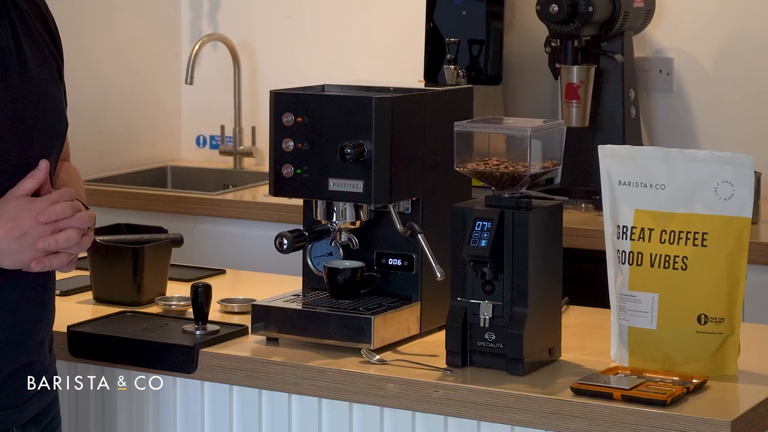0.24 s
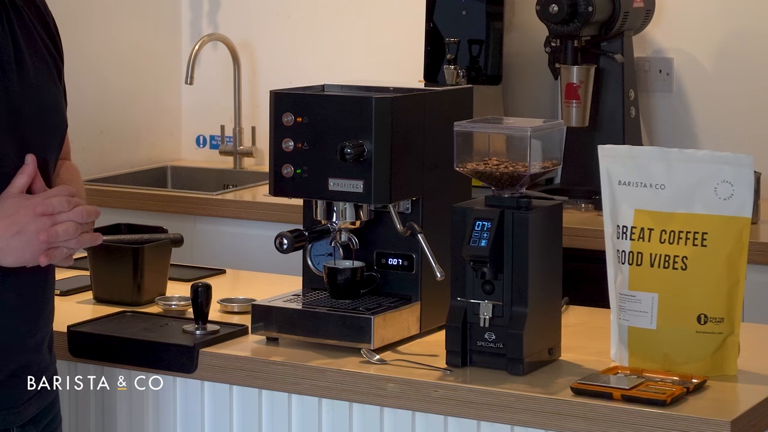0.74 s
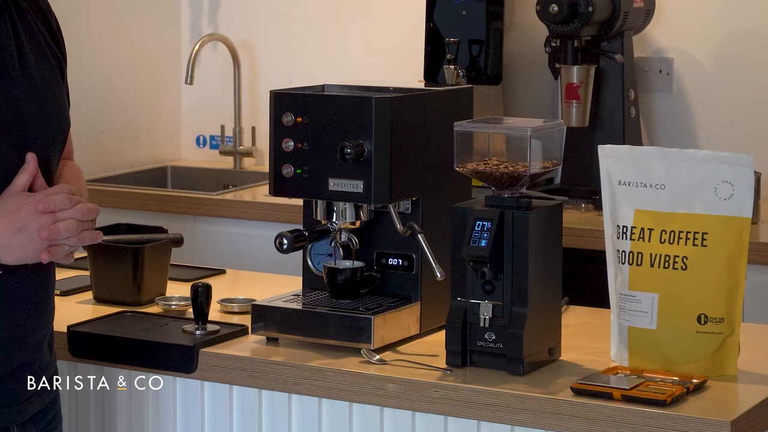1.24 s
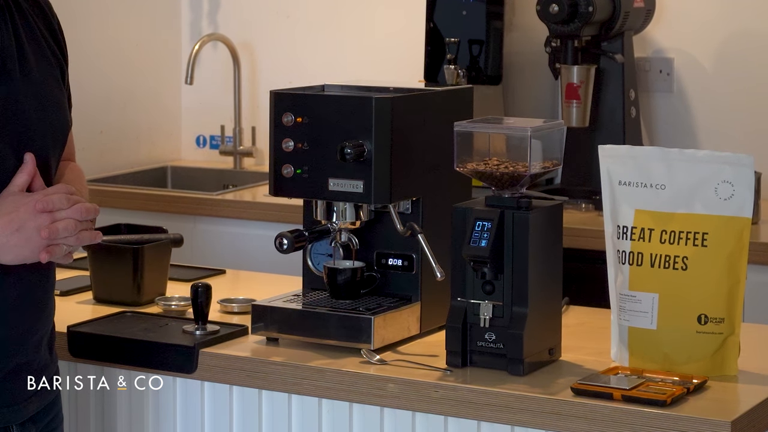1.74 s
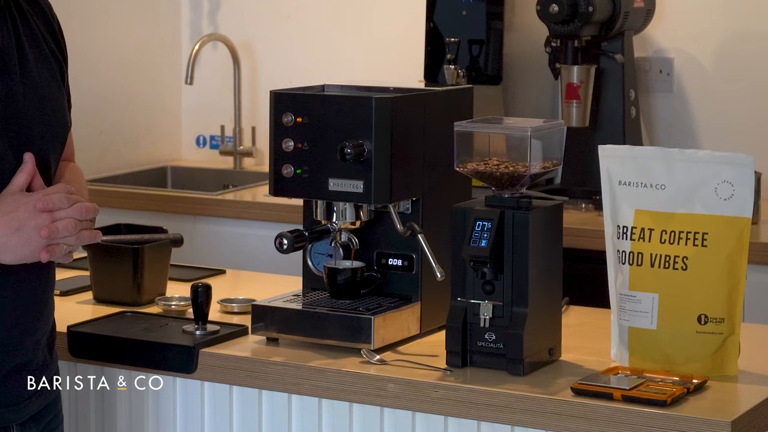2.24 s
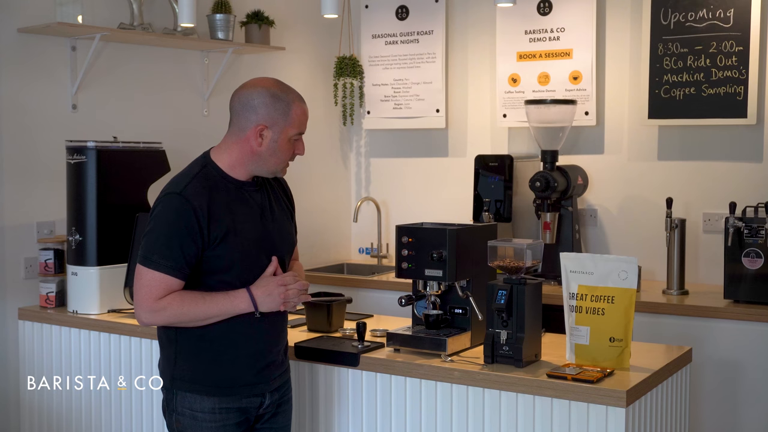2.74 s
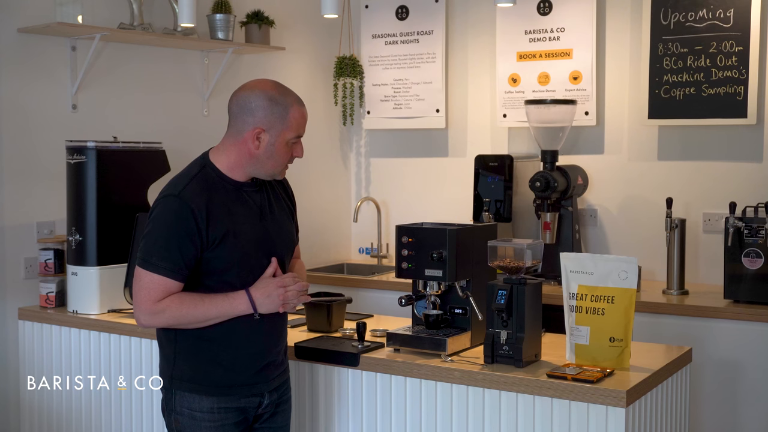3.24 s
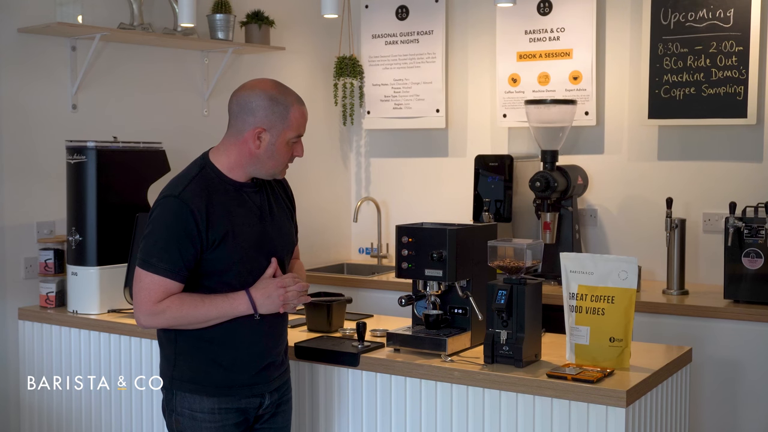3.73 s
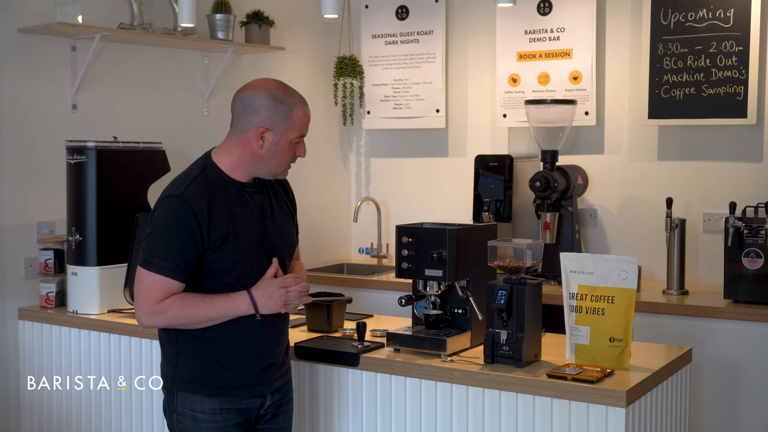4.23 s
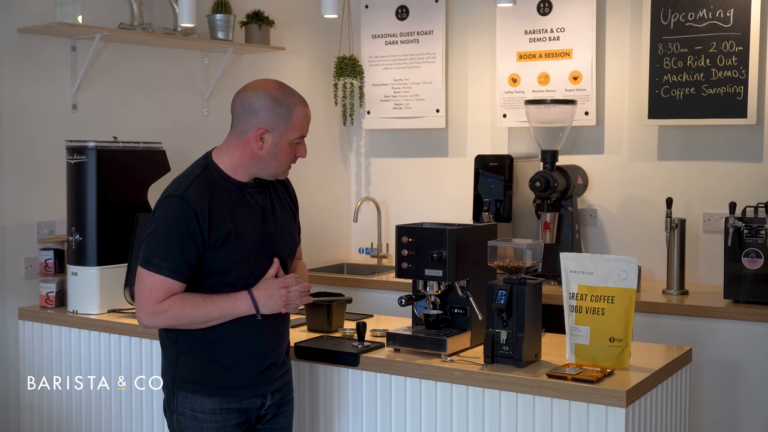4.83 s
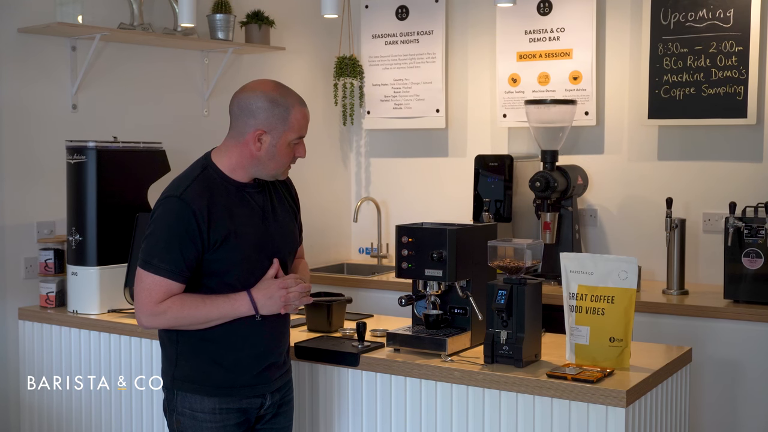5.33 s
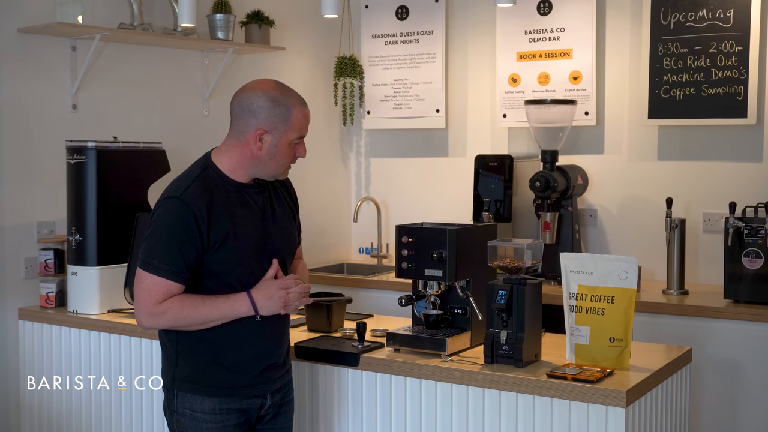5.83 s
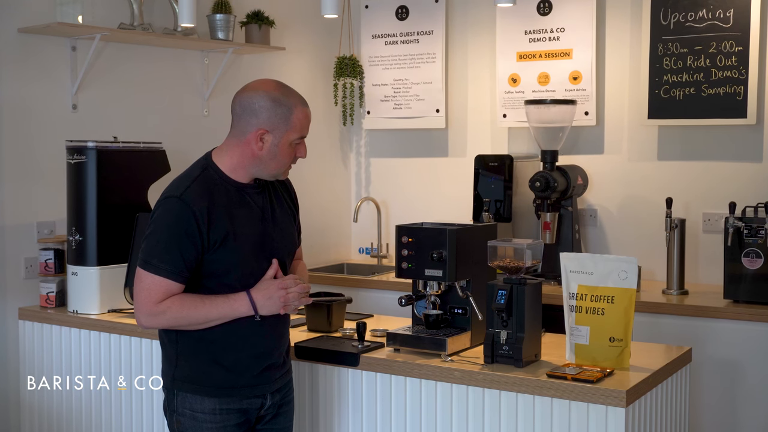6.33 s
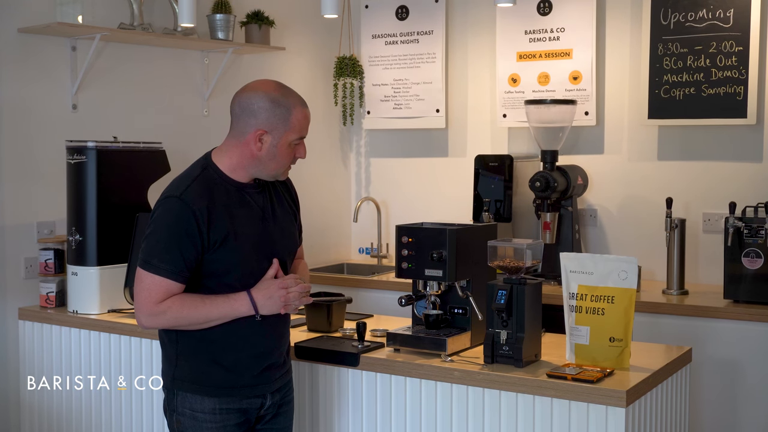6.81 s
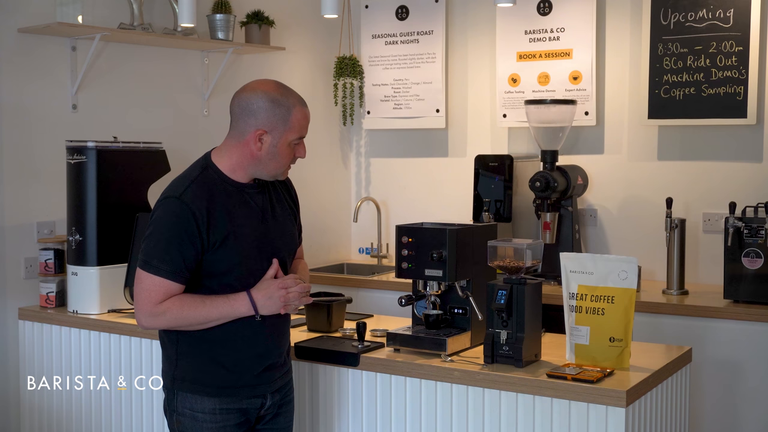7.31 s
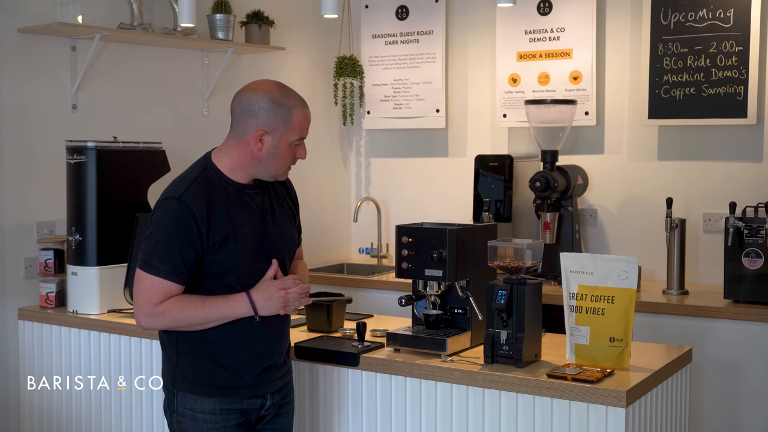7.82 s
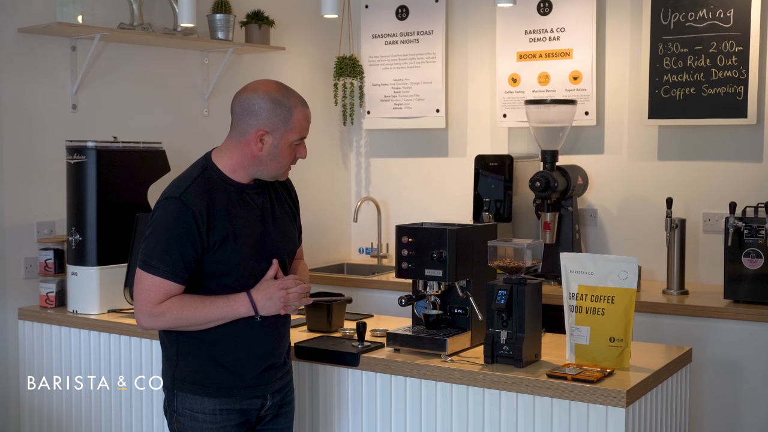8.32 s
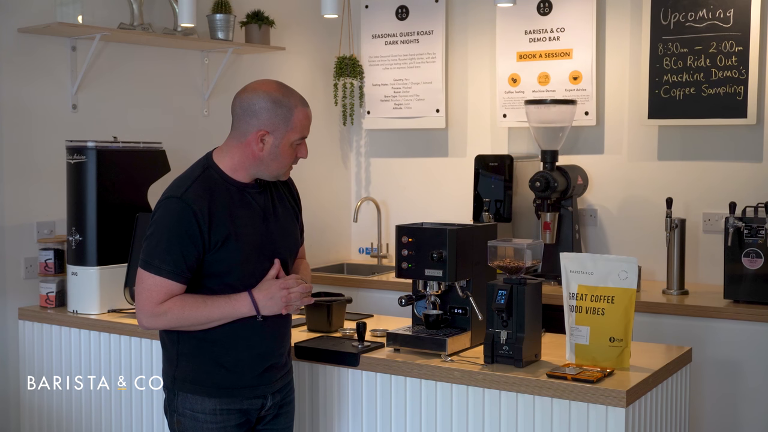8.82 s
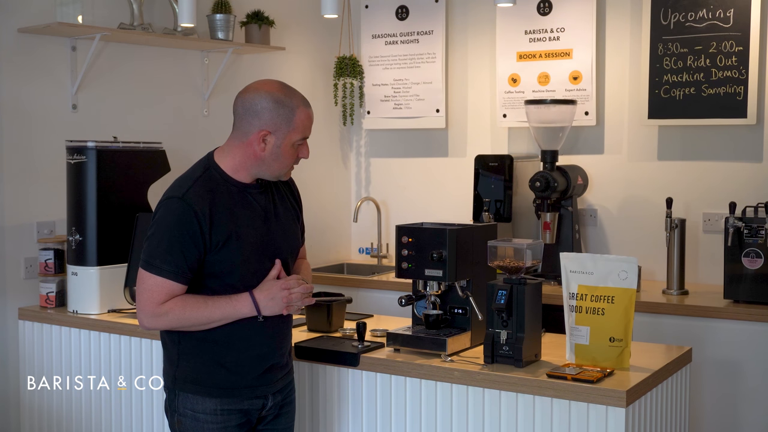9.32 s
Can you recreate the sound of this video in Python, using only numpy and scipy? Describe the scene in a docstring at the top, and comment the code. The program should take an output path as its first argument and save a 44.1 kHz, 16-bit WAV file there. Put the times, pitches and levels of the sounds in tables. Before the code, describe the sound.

In a quiet kitchen, the vibrating pump of an espresso machine drones steadily, mixed with the hiss of water being forced through. It spits faintly at the start and swells a little over the first few seconds. Coffee drips, then trickles softly into a cup, while the drip tray and other loose parts chatter in short spells. The buzz weakens a little toward the end.

```python
"""The vibratory pump of an espresso machine pushes water through coffee in a quiet kitchen.
From the start its piston strikes once per mains cycle: the case hums and buzzes, loose parts rattle,
water rasps, and the valves puff and spit. By 1.6 s the rising pressure seats the piston; the hum
fills out. A few drops fall into the cup, and from about 3.5 s a thin stream gurgles. After 6 s the
coffee yields and the hum shifts its colour; near the end the pump eases and falters."""
import sys
import numpy as np
from scipy import signal
from scipy.fft import rfft, irfft, next_fast_len
from scipy.io import wavfile
from scipy.ndimage import uniform_filter1d

SR = 44100
rng = np.random.default_rng(int(sys.argv[2]) if len(sys.argv) > 2 else 0)


def put_to_file(sound):
    """Save the sound as 16-bit audio at rate SR, in the file named by the first command-line argument."""
    columns = np.atleast_2d(sound).T  # one column per channel
    safe = np.clip(columns, -1, 1)
    whole_steps = np.round(safe * 32767)
    wavfile.write(sys.argv[1], SR, whole_steps.astype(np.int16))


N = 421596
TIME = np.arange(N) / SR
MAINS_HZ = 50.0138

# harmonics of the stroke rate that the case radiates best: order
STRONG_ORDERS = (1, 2, 4, 5, 6, 7, 15)
# how hard the pump works, climbing with the pressure and easing as the coffee runs: time_s, level_db
EFFORT = [(0, -8), (0.5, -5.5), (1.2, -3.5), (2.4, -1.5), (3.3, 0.1), (4.4, 0.5), (7, -0.33), (8.3, -0.8),
          (9.56, -2.5)]
# resonances of the thin metal around the pump: centre_hz, width_hz, gain_db
METAL_MODES = [(3520, 120, 3), (4240, 130, 2), (5010, 120, 2), (5600, 150, -0.5), (5810, 200, -5),
               (6610, 130, 2), (7340, 140, 3.5), (8250, 140, 4.5), (9300, 370, 5), (10200, 130, -2),
               (10860, 140, 4), (11400, 140, 4), (12680, 380, 9), (13650, 240, 6)]


def gain_of(db):
    """Amplitude ratio: a factor of ten for every 20 dB."""
    return np.exp(np.asarray(db) * (np.log(10) / 20))


def unit_rms(x):
    """Normalisation to a mean power of one."""
    return x / np.sqrt(np.mean(x ** 2) + 1e-20)


def curve(rows):
    """Linear interpolation of a time table at every sample."""
    return np.interp(TIME, *np.transpose(rows))


def at_frequency(rows, hz):
    """Interpolation of a table on a logarithmic frequency axis."""
    table_hz, values = np.transpose(rows)
    return np.interp(np.log(hz + 1), np.log(table_hz + 1), values)


def spell(centre_s, half_s):
    """A Gaussian envelope, from zero to one and back."""
    return np.exp(-((TIME - centre_s) / half_s) ** 2)


def drift(per_s):
    """Smooth random modulation of unit rms."""
    points = uniform_filter1d(rng.standard_normal(4000), 3)
    return unit_rms(np.interp(TIME * per_s, np.arange(len(points)), points))


def add(mix, start_s, sound):
    """Superposition: a sound joins the mix at its start time."""
    part = mix[max(round(start_s * SR), 0):][:len(sound)]
    part += sound[:len(part)]


def coloured(x, spectrum, modes=()):
    """Spectral shaping by a smooth envelope with bell-shaped resonances on top."""
    size = next_fast_len(N)
    hz = np.fft.rfftfreq(size, 1 / SR)
    peaks_db = sum(db / (1 + (2 * (hz - centre) / width) ** 2) for centre, width, db in modes)
    return irfft(rfft(x, size) * gain_of(at_frequency(spectrum, hz) + peaks_db), size)[:N]


def kitchen(x, wet_db):
    """Reverberation: a diffuse tail decays exponentially in each band; the power stays the same."""
    # reverberation time of the room: frequency_hz, t60_s
    decay_times = [(200, 0.37), (2000, 0.54), (8000, 0.61), (16000, 0.73)]
    hz, t, bands = signal.stft(rng.standard_normal(SR // 2), SR, nperseg=256)
    decay = gain_of(-60 * t / at_frequency(decay_times, hz)[:, None])
    tail = signal.istft(bands * decay, SR, nperseg=256)[1]
    wet = signal.fftconvolve(x, tail / np.linalg.norm(tail))[:N]
    return (x + gain_of(wet_db) * wet) / np.hypot(1, gain_of(wet_db))


def driven_db(full_db, db_per_effort_db, loose_db, seated_s=1.6, seating_s=.33):
    """Forced vibration: the level follows the effort, with an offset until the piston is seated."""
    looseness = np.clip((seated_s - TIME) / seating_s, 0, 1)
    return full_db + db_per_effort_db * curve(EFFORT) + loose_db * looseness


def hum(cycles, dispersion_rad=.13, resonant_order=5, bend_rad=.5, yields_s=6):
    """Harmonics cresting nearly together make one thump per stroke, under a higher drone."""
    # one row per strong order: full_db, db_per_effort_db, loose_db, yield_db_per_s, waver_db
    harmonics = [(-47.5, 1, 1.2, -0.1, 0.1), (-50, 1.2, 4.5, 2.5, 0.8), (-32, 0.37, -1.5, 0.1, 0.3),
                 (-35, 1.67, -0.7, 0.16, 0.07), (-33.5, 1.25, -1.5, 0.5, 0.2),
                 (-43.5, 0.83, 2.5, 1.86, 0.6), (-38, 3, -1, 0.5, -0.13)]
    # stumbles of the piston, each robbing or swelling one order: centre_s, half_s, order, gain_db
    stumbles = [(.38, 0.12, 6, -15), (.85, .18, 5, 1.5), (1.122, .07, 5, -15), (1.218, 0.059, 6, 5.5),
                (1.26, .04, 15, 8), (1.41, 0.1, 5, -19.5), (1.41, .05, 7, -5), (1.58, .08, 7, 5.5),
                (6.98, .1, 1, -6), (9.22, 0.099, 6, -4.5), (9.236, 0.16, 15, -9)]
    angle, out = 2 * np.pi * cycles, np.zeros(N)
    yielding_s = np.maximum(TIME - yields_s, 0)
    for order, (*drive, yield_db_per_s, waver_db) in zip(STRONG_ORDERS, harmonics):
        level_db = driven_db(*drive) + yield_db_per_s * yielding_s + waver_db * drift(14)
        level_db += sum(db * spell(s, half_s) for s, half_s, k, db in stumbles if k == order)
        if order == STRONG_ORDERS[-1]:  # each push bends the drone's pitch, giving it sidebands
            phase = bend_rad * np.sin(angle)
        else:  # the case shifts an order more, the farther it lies from the main resonance
            phase = dispersion_rad * (order - resonant_order) ** 2
        out += gain_of(level_db) * np.cos(order * angle + phase)
    return np.sqrt(2) * out


def buzz(cycles, scatter_db=4., wander=.16, size=4096):
    """Clatter repeating with every stroke has a line spectrum; case and room scatter its phases."""
    # the clear harmonics of the clatter: order, level_db
    clear_lines = [(3, -59), (8, -50.5), (9, -56.5), (10, -58.5), (11, -48.5), (12, -54.5), (13, -59),
                   (17, -69), (18, -81), (19, -58), (20, -51.5), (21, -43.5), (22, -56.5), (23, -48),
                   (24, -50.5), (25, -57), (26, -48.5), (27, -48.5), (28, -61), (29, -78), (30, -59),
                   (31, -53.5), (32, -56), (33, -53.5), (34, -53.5), (35, -48.5), (36, -56), (37, -70),
                   (38, -75), (39, -52.5), (42, -55.5), (44, -54), (53, -60), (60, -61.5), (62, -58.5),
                   (64, -57.5), (67, -61.5), (68, -63), (73, -76), (86, -64.5), (96, -69.5)]
    # envelope of the faint harmonics above and between them: frequency_hz, level_db
    faint_lines = [(2000, -72), (2600, -65), (3200, -63.8), (4000, -73.5), (5200, -74), (7000, -87),
                   (10000, -86)]
    # firmness of the stroke against the water: time_s, gain_db
    load = [(0, -10.5), (1, -8.5), (1.6, -7), (2.2, -6), (2.8, -5.5), (3.3, -6), (4.2, -4), (6.5, -2.5),
            (8.5, -3), (9.1, -2.5), (9.56, -2)]
    orders = np.arange(1, 200)
    db = at_frequency(faint_lines, orders * MAINS_HZ) + scatter_db * rng.standard_normal(len(orders))
    for order, line_db in clear_lines:
        db[round(order) - 1] = line_db
    amplitudes = gain_of(db) * ~np.isin(orders, STRONG_ORDERS)

    def strokes():
        """Fourier synthesis of one stroke with random phases, repeated."""
        phasors = np.exp(2j * np.pi * rng.random(len(orders)))
        shape = irfft(np.r_[0, amplitudes * phasors], size) * size / np.sqrt(2)
        return np.interp(cycles % 1 * size, np.arange(size + 1), np.r_[shape, shape[0]])

    # the shape of the stroke keeps changing a little
    clatter = strokes() + wander * (drift(2.75) * strokes() + drift(12) * strokes())
    return gain_of(curve(load)) * clatter


def ring(x, hz, width_hz):
    """Two damped resonators in cascade give a peak with steep skirts."""
    radius = np.exp(-np.pi * 1.5 * width_hz / SR)
    poles = [1, -2 * radius * np.cos(2 * np.pi * hz / SR), radius ** 2]
    once = signal.lfilter([1, 0, -1], poles, x)
    return unit_rms(signal.lfilter([1, 0, -1], poles, once))


def knocks(cycles, modes, limp, jitter_s):
    """Uneven impacts excite the modes; a limping part alternates its blows, doubling the period."""
    landings = np.flatnonzero(np.diff(np.floor(cycles)) > 0)
    out = np.zeros(N)
    for hz, width_hz, db in modes:
        force, lateness = rng.standard_normal((2, len(landings)))
        bounce = np.tanh(2 * drift(4.15)[landings]) * (-1) ** np.arange(len(landings))
        hits = np.clip(landings + (jitter_s * SR * lateness).astype(int), 0, N - 1)
        blows = np.zeros(N)
        blows[hits] = force + limp * bounce
        out += gain_of(db) * ring(blows, hz, width_hz)
    return out


def rattle(cycles, falter_db=5., sing_db=3.5):
    """Modal vibration: the strokes shake the rubber mount, drip tray, steam wand and side panels."""
    # resonances of each part: centre_hz, width_hz, level_db
    mount_modes = [(317.7, 50, 2.5), (215, 26, -10)]
    tray_modes = [(1225, 11, 0)]
    wand_modes = [(1636, 15, 0)]
    panel_modes = [(743, 69, -3.5), (775.6, 32, -3.5), (578, 26, -23), (979, 17, -14), (1118, 110, -7.5),
                   (1310, 25, -7), (1374, 27, -11.5), (1656, 190, -12.5), (1979, 55, -10), (2152, 10, -13)]
    # how hard each part is shaken: full_db, db_per_effort_db, loose_db, chatter_share, waver_db
    mount_shake = (-49.5, 0.2, 5.5, 0.25, 1.)
    tray_shake = (-49.5, 1., -1., 0.7, 1.5)
    wand_shake = (-45, 1.1, 0.5, 0.16, .5)
    panel_shake = (-44.5, 0.4, 0.5, 0.21, 0.1)
    # spells of chatter, strongest in the tray: centre_s, half_s, gain_db
    chatters = [(1.75, .08, 7.5), (2.3, 0.17, 5), (2.894, 0.37, 8), (4.55, 0.14, 10), (5.242, .1, 16),
                (5.56, 0.13, 11), (5.9, 0.062, 6), (7.047, 0.24, 10), (7.797, 0.19, 12), (8.147, 0.066, 10),
                (9.3, 0.15, 13.5)]
    # the wand sings as the piston settles; the mount shudders as the pump falters: centre_s, half_s
    singing = (1.7, 0.72)
    falter = (9.26, .16)
    chatter_db = sum(db * spell(s, half_s) for s, half_s, db in chatters)

    def loose_part(modes, shake, limp, jitter_s, compression):
        """Amplitude limiting: a loose part has only so much play, which evens out its swings."""
        *drive, chatter_share, waver_db = shake
        level_db = driven_db(*drive) + chatter_share * chatter_db + waver_db * drift(9)
        ringing = knocks(cycles, modes, limp, jitter_s)
        swing = np.sqrt(abs(uniform_filter1d(ringing ** 2, 3500)) + 1e-6)
        return gain_of(level_db) * unit_rms(ringing / swing ** compression)

    mount = loose_part(mount_modes, mount_shake, limp=.79, jitter_s=.00033, compression=.4)
    tray = loose_part(tray_modes, tray_shake, limp=1.5, jitter_s=.00003, compression=.59)
    wand = loose_part(wand_modes, wand_shake, limp=.71, jitter_s=.00003, compression=.71)
    panels = loose_part(panel_modes, panel_shake, limp=.67, jitter_s=.00005, compression=.96)
    wand *= gain_of(sing_db * spell(*singing))
    mount *= gain_of(falter_db * spell(*falter))
    return mount + tray + wand + panels


def rasp(cycles, level_db=-40.5, depth=.37, crest_cycles=.12, split_hz=4500):
    """Flow noise of water forced through the pump; its treble grows with effort and after each landing."""
    # spectrum of the flow noise: frequency_hz, density_db
    spectrum = [(200, -6), (420, -12.5), (620, -13.5), (860, -3), (1100, 1), (1600, 3.5), (2400, 0.5),
                (3200, -5.5), (4600, -9.5), (6000, -12.5), (8000, -22.5), (10500, -30), (13000, -36),
                (15700, -41)]
    effort_db = curve(EFFORT)
    water = kitchen(rng.standard_normal(N), wet_db=-4.5)
    bass = signal.filtfilt(*signal.butter(1, split_hz, fs=SR), water)
    swell = unit_rms(np.exp(2 * np.cos(2 * np.pi * (cycles - crest_cycles))))
    treble_gain = gain_of(.41 * effort_db) + depth * (swell - swell.mean())
    hiss = coloured(bass + treble_gain * (water - bass), spectrum, METAL_MODES)
    return gain_of(level_db + .76 * effort_db + .5 * drift(40)) * unit_rms(hiss)


def spray(cycles, gain_db=4., uneven_db=6., grain_db=2.):
    """Amplitude-modulated noise: each valve lets out one grainy puff a stroke, uneven in size."""
    # valve puffs after the piston lands: delay_cycles, rise_cycles, level_db
    valves = [(.04, 0.068, -8.5), (.73, 0.046, -3)]
    # strength of the fine spray: time_s, level_db
    levels = [(0, -70), (1.2, -70.5), (1.6, -87), (3.3, -75), (4.1, -64), (5.6, -69.5), (6.3, -69),
              (8.5, -67), (9.3, -70)]
    # spectrum of the spray: frequency_hz, density_db
    spectrum = [(3000, -20), (6000, 13.5), (9400, 7), (10700, 2), (13000, -3), (15700, -9)]
    puffs = np.zeros(N)
    for delay, rise, db in valves:
        stroke, phase = np.divmod(cycles + 2 - delay, 1)
        strength_db = db + uneven_db * np.clip(rng.standard_normal(600), -2, 2)[stroke.astype(int)]
        puffs += gain_of(strength_db) * np.sqrt(phase / rise) * np.exp(-phase / rise / 2)
    grains = puffs * gain_of(grain_db * drift(200)) * rng.standard_normal(N)
    hiss = coloured(kitchen(grains, wet_db=-2), spectrum, METAL_MODES)
    return gain_of(gain_db + curve(levels)) * unit_rms(hiss)


def room_tone(level_db=-50.):
    """Stationary noise, weighted to the bass, is the background of the kitchen."""
    # low murmur of the room: frequency_hz, density_db
    spectrum = [(8, -17), (25, 6.5), (40, 0), (75, -1.5), (130, -6.5), (200, -10), (500, -5.5), (2000, -22),
                (15000, -54)]
    return gain_of(level_db) * unit_rms(coloured(rng.standard_normal(N), spectrum))


def spits(gain_db=-1.6, t60_s=.034, band_hz=(8500, 15000)):
    """Noise transients: bright bursts decay exponentially while the valves still pass air."""
    # valve spits at low pressure: start_s, level_db
    bursts = [(0.0907, -48), (0.1301, -43), (0.1705, -45), (0.2518, -53), (0.4698, -51.5), (0.5302, -48),
              (0.6095, -52), (0.6504, -50.5), (0.6908, -50), (0.9093, -41.5), (1.0106, -51), (1.1304, -58)]
    t, out = np.arange(SR // 10) / SR, np.zeros(N)
    bright = signal.butter(2, band_hz, "bandpass", fs=SR)
    for start_s, db in bursts:
        spit = signal.lfilter(*bright, rng.standard_normal(len(t)) * gain_of(-60 * t / t60_s))
        add(out, start_s, gain_of(db + gain_db) * spit / abs(spit).max())
    return kitchen(out, wet_db=-3)


def drops(gain_db=-5., rise_s=.001, glide_per_s=12.):
    """Bubble resonance: each drop traps a tiny pocket of air that rings briefly and rises in pitch."""
    # drops of coffee falling into the cup: start_s, level_db, pitch_hz
    falls = [(.8175, -37, 6070), (2.3994, -34, 4650), (2.9083, -32, 4640), (3.7858, -30, 4550),
             (4.0367, -28, 4570), (4.0955, -34, 4550), (4.1574, -27, 4300), (4.4887, -37, 4030),
             (6.9456, -35, 4490), (8.1409, -31, 4670)]
    t, out = np.arange(SR // 50) / SR, np.zeros(N)
    envelope = t / rise_s * np.exp(1 - t / rise_s)
    for start_s, db, hz in falls:
        tone = np.sin(2 * np.pi * hz * t * (1 + glide_per_s * t / 2))
        add(out, start_s, gain_of(db + gain_db) * envelope * tone)
    return kitchen(out, wet_db=-1.5)


def trickle(bubbles_per_s=45., low_hz=388., high_hz=700., t60_s=.064, glide_per_s=3.7):
    """The thin stream gurgles with many bubbles, each a damped oscillator of rising pitch."""
    # coffee running into the cup: time_s, level_db
    flow = [(0, -85), (3.2, -77), (3.6, -55), (4.5, -54), (6.5, -58), (9.56, -68)]
    t, out = np.arange(SR // 16) / SR, np.zeros(N)
    for k, (lateness, pitch, strength) in enumerate(rng.random((900, 3))):
        start_s = (k + 4 * lateness) / bubbles_per_s
        if start_s < TIME[-1]:
            hz = low_hz * (high_hz / low_hz) ** pitch
            tone = np.sin(2 * np.pi * hz * t * (1 + glide_per_s * t / 2))
            envelope = gain_of(-60 * t / t60_s) * (1 - np.exp(-t * hz))
            add(out, start_s, (.4 + strength) * envelope * tone)
    return gain_of(curve(flow)) * unit_rms(out)


def scene():
    """Superposition: one piston drives pump and water; the cup and the room add their own sounds."""
    # where in the mains cycle the piston lands: time_s, phase_cycles
    landing = [(0, .575), (1.8, .555), (3, .535), (4.5, .515), (7, .52), (9.56, .545)]
    cycles = MAINS_HZ * TIME - curve(landing)
    pump = hum(cycles) + buzz(cycles) + rattle(cycles)
    water = rasp(cycles) + spray(cycles) + spits()
    cup = trickle() + drops()
    return (pump + water + cup + room_tone())[None]


def record(dry):
    """Band limiting: a steep low-pass filter removes the highest treble."""
    cutoff_hz = 15720
    lowpass = signal.firwin(1023, cutoff_hz, window=("kaiser", 10), fs=SR)
    return signal.oaconvolve(dry, lowpass[None], "same")


dry = scene()
out = record(dry)
put_to_file(out)
```